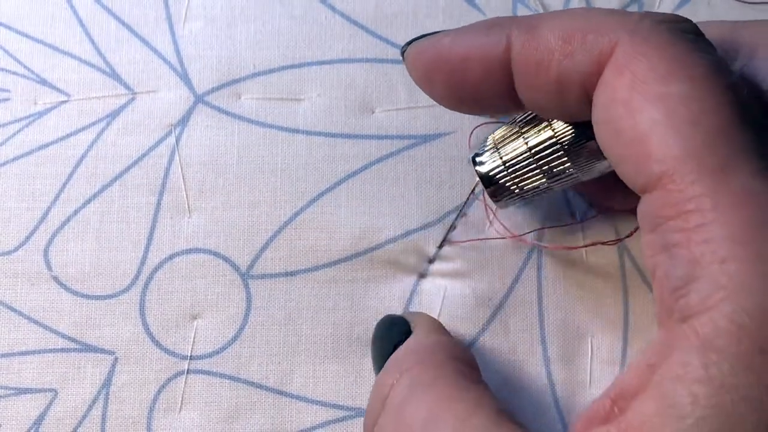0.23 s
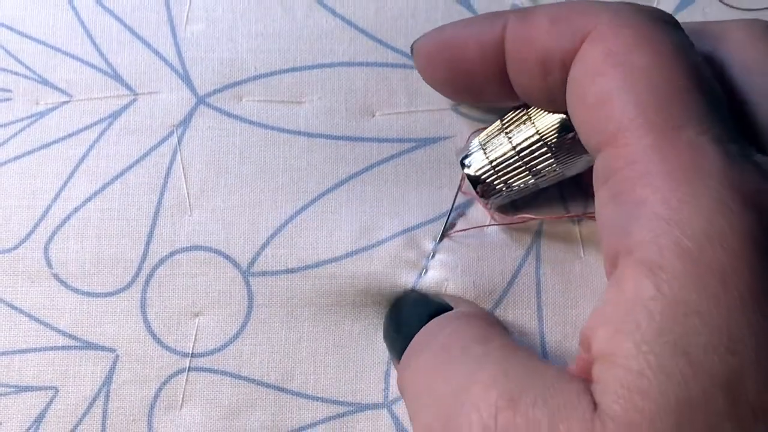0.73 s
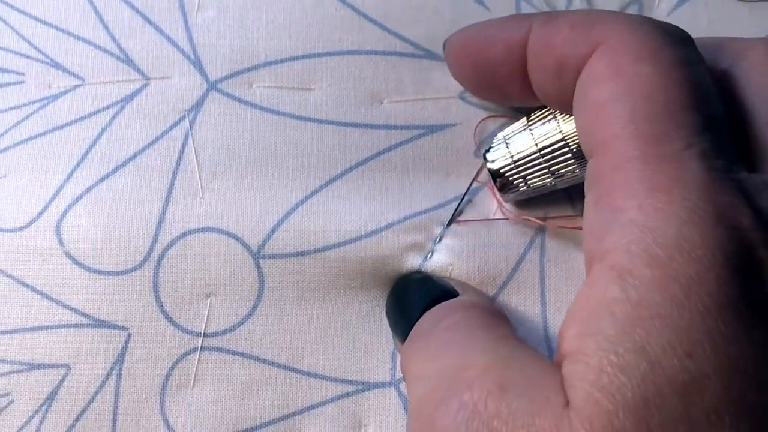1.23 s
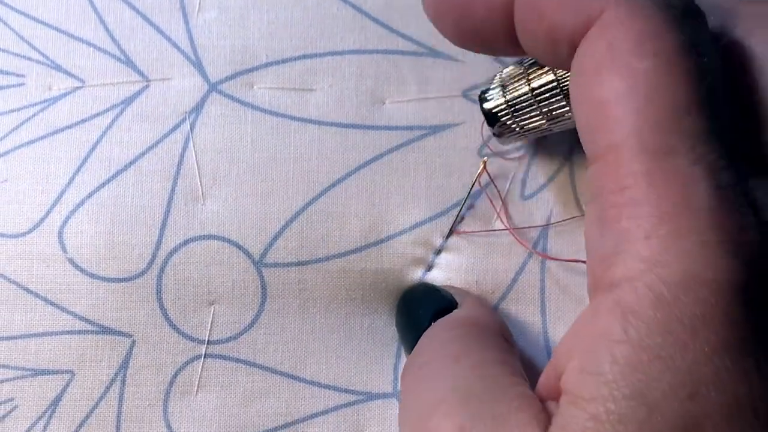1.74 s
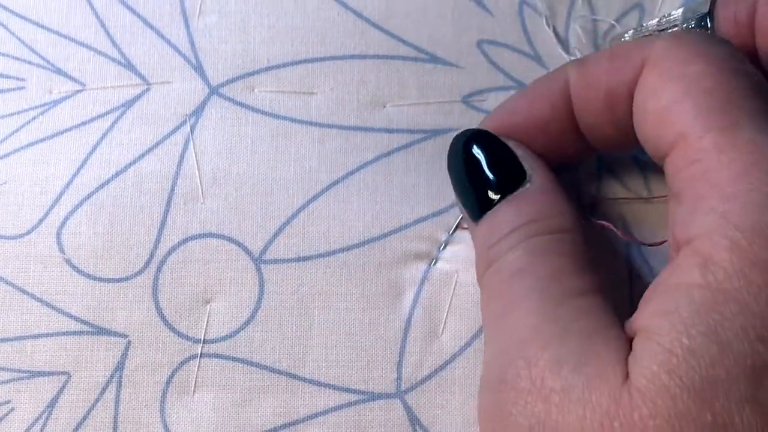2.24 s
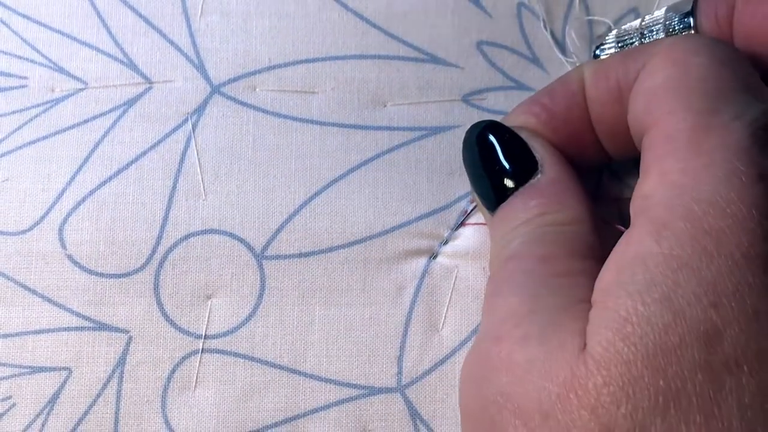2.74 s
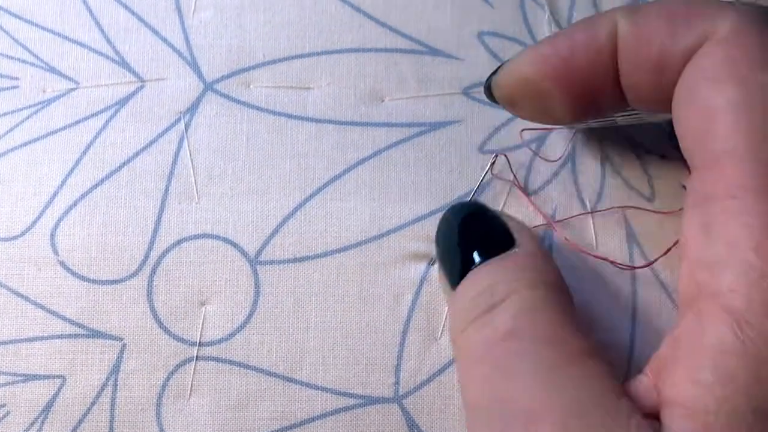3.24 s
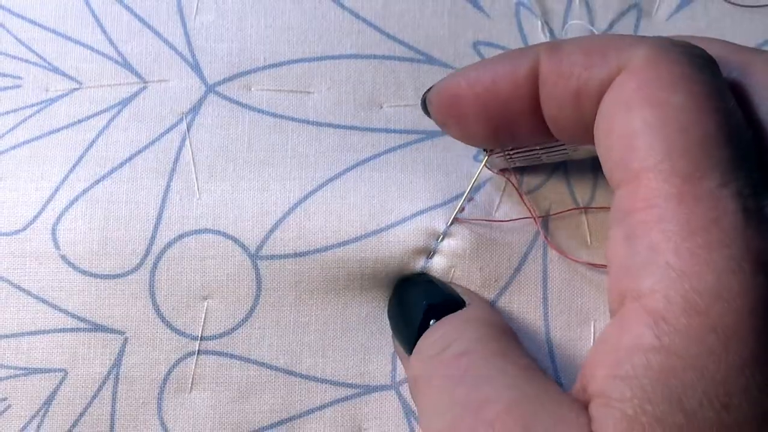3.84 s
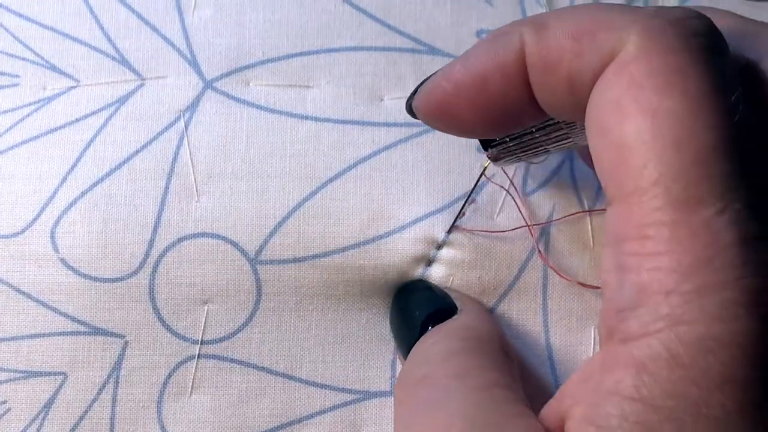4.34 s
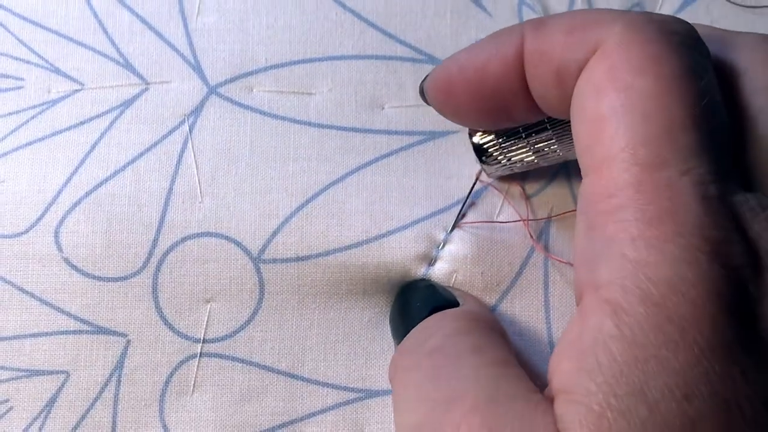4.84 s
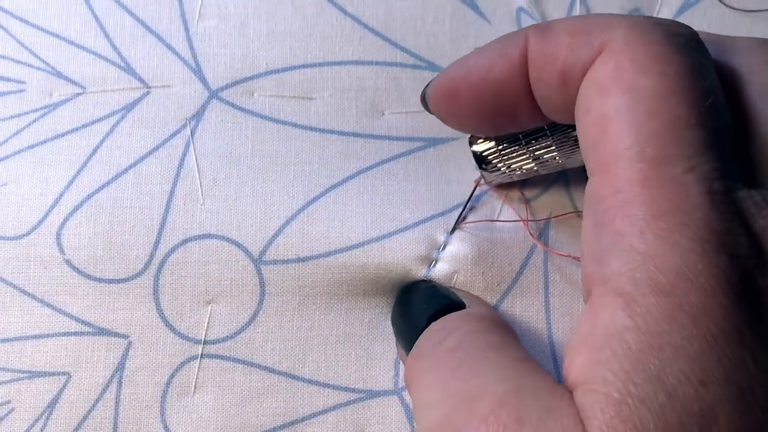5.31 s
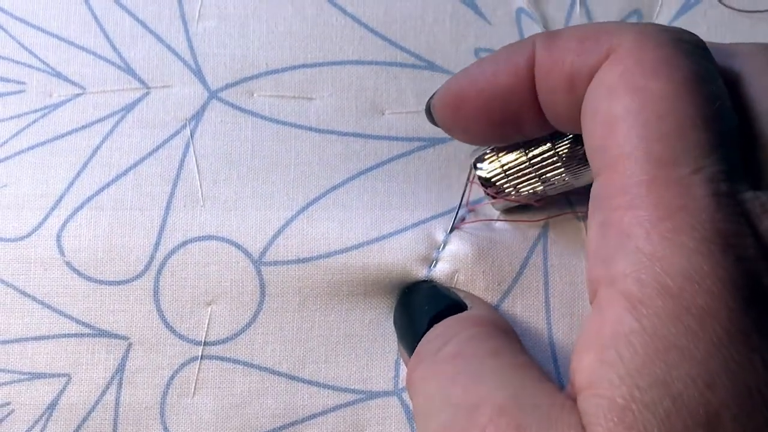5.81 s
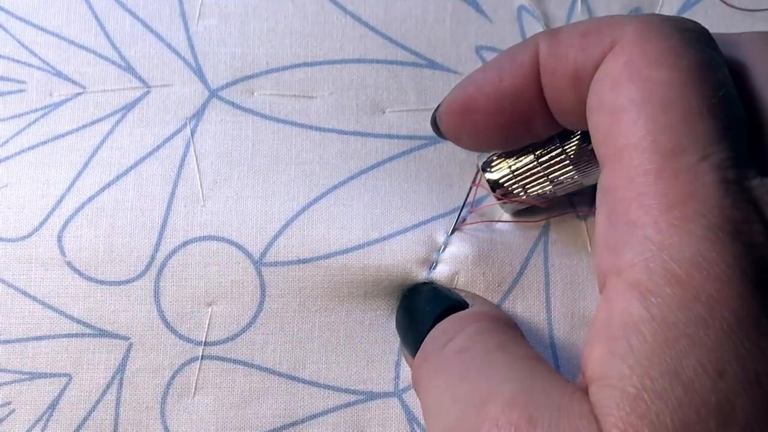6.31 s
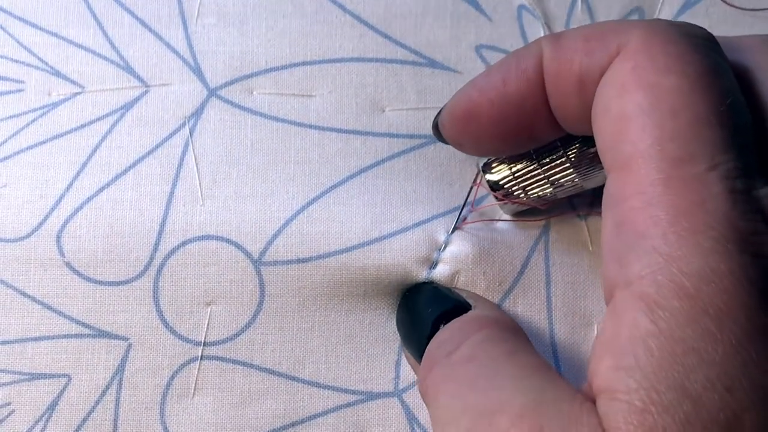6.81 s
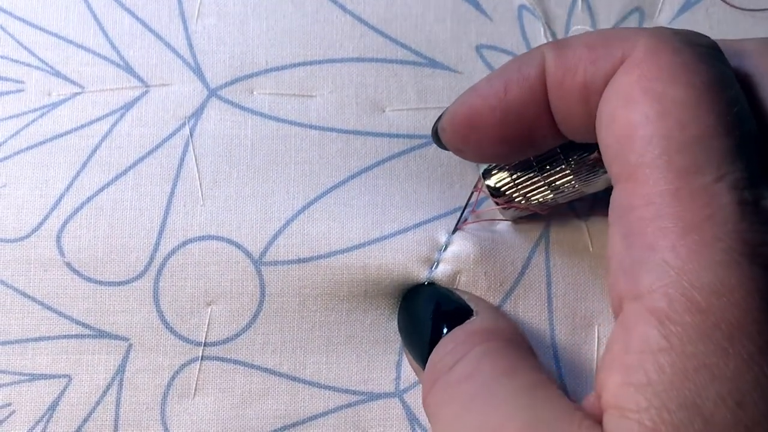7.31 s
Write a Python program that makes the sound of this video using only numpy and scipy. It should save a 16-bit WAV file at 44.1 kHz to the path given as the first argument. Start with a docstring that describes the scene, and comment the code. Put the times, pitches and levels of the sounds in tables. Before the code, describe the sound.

A metal thimble clicks irregularly against a needle going through taut cloth, with soft fabric brushing over a faint hum and thin whine.

```python
"""A metal thimble nudges a quilting needle through cloth stretched in a hoop, close by in a small room.
A mains hum and a small motor's thin whine run from the start. First come a few clicks, each a steel
tick plus a dull thump of the tight cloth. Then fingers brush the fabric, a thumb rasps near 2 s and
the needle pricks softly. Clicks return at 4.4 s; after the sharpest, at 5.6 s, the whine eases, and
one last click falls at 7.1 s. Automatic gain control turns everything down after the loud clicks."""
import sys
import numpy as np
from scipy import signal
from scipy.fft import rfft, irfft, next_fast_len
from scipy.io import wavfile
from scipy.ndimage import uniform_filter1d

SR = 44100
rng = np.random.default_rng(int(sys.argv[2]) if len(sys.argv) > 2 else 0)


def inscribe(sig):
    """Save sig as 16-bit PCM at rate SR to the path in sys.argv[1].

    A 1-D sig is mono; a 2-D sig holds one channel per row.
    Samples are clipped to [-1, 1] before scaling.
    """
    pcm = np.round(np.clip(np.atleast_2d(sig).T, -1, 1) * 32767)
    wavfile.write(sys.argv[1], SR, pcm.astype(np.int16))


N = 333396
TIME = np.arange(N) / SR
CONTACT_TIME = np.arange(-64, 448) / SR  # seconds around one contact


def clicks():
    """The thimble ticks on the needle, which passes the blow on to cloth and hoop."""
    # Pitch and breadth (1 is usual, more is duller) depend on where the cloth is pressed.
    # Each row: start in seconds, cloth pitch in Hz, cloth level in dB, breadth, hoop level in dB,
    # cancelled band in Hz, needle pitch in Hz, needle level in dB, tick pitch in Hz, tick level in dB,
    # skid fade in seconds. Levels in all tables are relative.
    contacts = [(0.2491, 410, -48, 1.5, -47, 782, 1530, -44.5, 12500, -54, 0.0009),
                (0.2551, 192, -46.5, 0.9, -53.5, 760, 2170, -43.5, 12000, -49, 0.0011),
                (0.4009, 444, -47, 0.46, -55, 782, 4500, -52, 11000, -58, 0.00068),
                (0.9755, 398, -60, 0.6, -63, 782, 3385, -44, 7950, -48, 0.00025),
                (1.268, 520, -46.5, 1.7, -42, 850, 3380, -39.5, 11800, -35.5, 0.0003),
                (1.273, 467, -38.5, 1, -59, 840, 3670, -37.5, 13500, -41, 0.00064),
                (1.4534, 442, -42, 1.1, -41, 782, 4160, -48, 13200, -41.5, 0.00067),
                (1.469, 430, -56, 1.2, -58, 782, 3040, -44, 14100, -39, 0.00082),
                (1.47, 438, -26, 1.22, -37, 785, 3000, -43, 14400, -53, 0.00076),
                (4.376, 300, -58, 1.2, -68, 782, 3400, -66, 14000, -58, 0.0003),
                (4.3813, 288, -46, 1.2, -56, 782, 3370, -55, 13100, -49.5, 0.00046),
                (4.4037, 324, -44, 1.4, -48.5, 770, 2500, -45, 14300, -37.5, 0.0003),
                (4.6197, 370, -33, 1.07, -45.5, 782, 2320, -53.5, 11800, -48, 0.00042),
                (5.5947, 565, -38, 0.77, -31.5, 713, 3400, -36, 12000, -23.5, 0.00036),
                (5.5973, 373, -29, 0.74, -38.5, 710, 3360, -44.5, 12000, -38, 0.00091),
                (7.089, 457, -27.5, 1.18, -35.5, 796, 1940, -42.5, 7300, -35, 0.0006)]
    # The snap of steel on steel. Each row: multiple of the tick pitch, level in dB.
    steel_spectrum = [(.04, -55), (.17, -29.5), (.4, -8.5), (.6, -15), (.8, -3.5), (.92, -3.5), (1, 3.5),
                      (1.08, -6.5), (1.18, -1), (1.32, -2.5), (1.9, -1)]
    out = np.zeros(N)
    for (start, cloth_hz, cloth_db, breadth, hoop_db, notch_hz,
         needle_hz, needle_db, tick_hz, tick_db, skid_s) in contacts:
        force = skid(slip_share=1.1, fade_s=skid_s)
        tick = np.convolve(force, ring(pitched(steel_spectrum, tick_hz), ripple_db=1.2))
        add(out, start + CONTACT_TIME[0], amp(tick_db) * unit_blow(tick))
        for at, part in needle_hoop_cloth(start, cloth_hz, cloth_db, needle_hz, needle_db,
                                          hoop_db, breadth):
            add(out, at, hollowed(part, notch_hz))
    return out


def pricks():
    """The point pricks the weave or a finger lands, stirring needle, cloth and hoop without a tick."""
    # Each row: start in seconds, cloth pitch in Hz, cloth level in dB, needle level in dB,
    # needle pitch in Hz.
    soft_contacts = [(0.02, 400, -75, -61, 3000), (0.261, 99, -49.5, -80, 1800),
                     (0.8418, 420, -52.5, -52, 3300), (1.174, 416, -50.5, -59.5, 2000),
                     (1.7988, 400, -64, -59.5, 3170), (1.8556, 310, -46, -71, 1800),
                     (1.978, 258, -59, -78, 1800), (1.994, 360, -52, -83, 1800),
                     (2.6832, 404, -79, -57.5, 2830), (3.053, 400, -59, -65, 1600),
                     (3.109, 252, -46.5, -59.5, 3230), (3.262, 330, -58.5, -77, 3170),
                     (3.294, 306, -55, -83, 1800), (3.6174, 400, -78, -61, 2600),
                     (6.304, 320, -58, -83, 1800), (6.406, 317, -61, -79, 1800),
                     (6.472, 298, -58.5, -80, 1810), (6.692, 380, -65, -77, 1800)]
    out = np.zeros(N)
    for start, cloth_hz, cloth_db, needle_db, needle_hz in soft_contacts:
        hoop_db = 0.62 * cloth_db + 0.38 * needle_db - 5  # both cloth and needle shake the hoop
        for at, part in needle_hoop_cloth(start, cloth_hz, cloth_db, needle_hz, needle_db, hoop_db):
            add(out, at, hollowed(part))
    return out


def needle_hoop_cloth(start, cloth_hz, cloth_db, needle_hz, needle_db, hoop_db, breadth=1):
    """The needle twangs, the hoop knocks and the cloth thumps: three pairs of start time and sound."""
    # The needle bending. Each row: multiple of its pitch, level in dB.
    needle_spectrum = [(.2, -12.5), (.62, -10.5), (.82, -6), (1, 0), (1.2, -5.5), (1.45, -10), (1.8, -9),
                       (2.3, -8.5), (3.6, -17), (5, -24)]
    # The hoop ringing. Each row: frequency in Hz, level in dB.
    hoop_spectrum = [(60, -58), (300, -12), (600, -0.5), (950, 4.5), (1300, 2.5), (1550, -4), (1850, -2),
                     (2200, -19.5), (5000, -19.5)]
    # Tight cloth, muffled by hand and padding. Each row: multiple of its pitch, level in dB.
    cloth_spectrum = [(.05, -40), (.3, -11.5), (.45, -7), (.72, 1), (1, 6.5), (1.25, 1.5), (1.55, -5),
                      (1.95, -17.5), (4, -51.5), (12, -86)]
    force = skid(slip_share=1.36, fade_s=0.00097)
    needle = np.convolve(force, ring(pitched(needle_spectrum, needle_hz), ripple_db=3.1))
    hoop = ring(hoop_spectrum, ripple_db=3.0)
    cloth = ring(pitched(cloth_spectrum, cloth_hz, breadth), ripple_db=3.1)
    return [(start + CONTACT_TIME[0], amp(needle_db) * unit_blow(needle)),
            (start, amp(hoop_db) * unit_blow(hoop)),
            (start + 0.00028, amp(cloth_db) * unit_blow(cloth))]  # soft cloth answers a moment later


def skid(slip_share, fade_s):
    """One hard hit followed by tiny slips; it feeds all frequencies about equally."""
    t = CONTACT_TIME
    slips = rng.standard_normal(len(t)) * np.exp(-abs(t) / fade_s) * (t > 0)
    spectrum = rfft((t == 0) + slip_share * slips / np.linalg.norm(slips))
    return irfft(spectrum / np.sqrt(abs(spectrum) ** 2 + .1))


def ring(spectrum, ripple_db, size=2048):
    """A struck part rings; every point of contact favours other frequencies."""
    hz = np.fft.rfftfreq(size, 1 / SR)
    ripple = uniform_filter1d(rng.standard_normal(len(hz)), size=18)
    ripple = unit_rms(uniform_filter1d(ripple, size=12))
    log_gain = np.log(amp(look_up(spectrum, hz) + ripple_db * ripple))
    mirrored = np.concatenate([log_gain, log_gain[-2:0:-1]])
    with_phase = np.exp(np.conj(signal.hilbert(mirrored)))  # so the ring follows the hit
    return np.fft.ifft(with_phase).real


def rubbing(size=32768):
    """Scrapes start quickly and die fast; slides swell and fade in one round arch."""
    # Nail or thread scraping the weave. Each row: start in seconds, level in dB,
    # brightness in dB per octave, low rustle compared with the scratch in dB.
    scrapes = [(0.646, -64.5, 6, -23), (1.285, -64.5, 9, -13), (1.68, -65.5, 4, -14),
               (2.678, -59.5, 2, -10), (3.61, -59.5, 1.6, -11)]
    # Fingers sliding over the cloth or bunching it onto the needle. Each row: start in seconds,
    # length in seconds, then level, brightness and rustle as above.
    slides = [(0.761, 0.27, -70.5, 1.5, 1.5), (0.997, 0.23, -70.5, -10, 4), (1.843, 0.21, -71.5, 10.5, 6),
              (2.0, 0.22, -68.5, -2.5, -17), (3.128, 0.22, -71, 6, 4), (3.297, 0.23, -73.5, 0.5, 0.5),
              (3.664, 0.13, -65, -11, -20), (4.021, 0.12, -75.5, 8, -7), (4.322, 0.063, -68, -5, -20),
              (6.049, 0.19, -79.5, -7, 7)]
    rise_s, fade_s = 0.01, 0.039
    out, t = np.zeros(N), np.arange(size) / SR
    flick = np.minimum(t / rise_s, 1) * np.exp(-np.maximum(t - rise_s, 0) / fade_s)
    for start, db, tilt_db, rustle_db in scrapes:
        add(out, start, amp(db) * flick * friction(t, tilt_db, rustle_db))
    for start, length, db, tilt_db, rustle_db in slides:
        add(out, start, amp(db) * arch(t, length) * friction(t, tilt_db, rustle_db))
    return out


def friction(t, tilt_db, rustle_db):
    """Skin catches on the weave in tiny grains while the cloth rustles underneath in uneven lumps."""
    # The bright scratch and the low rustle. Each row: frequency in Hz, level in dB.
    scratch_spectrum = [(200, 4.5), (600, 6), (1100, 6), (1500, 0.5), (2100, -6.5), (3200, -2.5),
                        (4500, -10), (6200, -7), (8000, -17), (10500, -24.5), (13000, -20.5),
                        (16000, -31.5)]
    rustle_spectrum = [(50, -12), (150, -9), (300, -2), (450, -10), (750, -19.5), (1500, -21.5),
                       (4000, -32.5)]
    size, knots = len(t), t[::700]
    grip = np.interp(t, knots, rng.standard_normal(len(knots)))  # the finger sticks and lets go
    catches = rng.random(size) < 3500 / SR  # about 3500 a second
    catch_db = 2.6 * np.minimum(rng.exponential(1, size), 5)
    grains = rng.standard_normal(size) * (catches * amp(catch_db) + 0.38)
    scratch = amp(1.3 * grip) * coloured(grains, scratch_spectrum, tilt_db)
    rustle = amp(rustle_db + 2.8 * grip) * coloured(rng.standard_normal(size), rustle_spectrum)
    return scratch + rustle


def rasping(slips_per_s=300, size=16384):
    """The thumb drags over the threads, and its uneven slips make the stretched cloth ring."""
    # Thumb strokes. Each row: start in seconds, length in seconds, level in dB.
    strokes = [(1.845, 0.36, -73), (2.019, 0.36, -72)]
    # The cloth's narrow ring. Each row: frequency in Hz, level in dB.
    rasp_spectrum = [(300, -26), (800, -13), (975, 7), (1070, -14), (1180, 7), (1300, -15), (2500, -34)]
    out, t = np.zeros(N), np.arange(size) / SR
    for start, length, db in strokes:
        slips = rng.standard_normal(size) * (rng.random(size) < slips_per_s / SR)
        add(out, start, amp(db) * arch(t, length) * coloured(slips, rasp_spectrum))
    return out


def hollowed(x, hz=782, width_hz=120):
    """The straight path from hoop to microphone cancels one narrow band."""
    return x - signal.lfilter(*signal.iirpeak(hz, hz / width_hz, SR), x)


def room_echo(x, level_db, echoes_per_s=4000, size=22050):
    """The room throws back scattered echoes, each band dying at its own speed."""
    # How long the room rings. Each row: frequency in Hz, seconds to fade by 60 dB.
    fade_times = [(150, 0.35), (450, 0.34), (750, 0.38), (1200, 0.53), (2400, 0.3), (4000, 0.28),
                  (8000, 0.23), (15000, 0.24)]
    # The tone of the echo. Each row: frequency in Hz, level in dB.
    echo_spectrum = [(100, 6), (300, 5), (450, -2), (600, 7), (800, 7.5), (1200, -1.5), (1700, 0),
                     (2400, 0.5), (3400, -0.5), (6000, -0.5), (12000, -6), (16000, -14.5)]
    echoes = rng.choice([-1., 1.], size) * (rng.random(size) < echoes_per_s / SR)
    hz, t, bands = signal.stft(echoes, SR, nperseg=256)
    bands *= amp(look_up(echo_spectrum, hz)[:, None] - 60 * t / look_up(fade_times, hz)[:, None])
    tail = signal.istft(bands, SR, nperseg=256)[1]
    tail *= np.clip((np.arange(len(tail)) / SR - 0.003) / 0.002, 0, 1)  # near surfaces answer in 3-5 ms
    return amp(level_db) * signal.fftconvolve(x, tail / np.linalg.norm(tail))[:N]


def background(sink_db_per_s=0.42):
    """Room rumble and hiss, mains hum and motor whine, all slowly getting quieter."""
    # Rumble and hiss. Each row: frequency in Hz, level in dB.
    air_spectrum = [(20, -17.5), (35, -7), (55, 2), (90, -3), (180, -5), (280, -6), (380, -12),
                    (800, -18.5), (2000, -23), (4500, -25.5), (6500, -27), (10500, -33.5), (13000, -29),
                    (16000, -36.5)]
    # The hum, then the tones of the whine. Each row: pitch in Hz, width in Hz, first and last level
    # in dB before sinking and easing, dB lost when the whine eases (below zero is a gain).
    tones = [(119.2, 0.57, -63, -62, 1), (271.2, 12.38, -79, -70.5, 5), (1111, 13.2, -79, -80, -2),
             (1189.5, 3.66, -75, -73.5, 5.5), (1219, 3.74, -78, -75, 7.5), (1400, 60, -78.5, -99, -10),
             (2687, 9.6, -78.5, -79, -1), (4123, 52, -75, -96.5, -2), (4500, 14, -77.5, -77.5, 1),
             (4600, 45, -78, -83.5, 2.5), (5470, 17, -78, -82.5, 7.5), (5710, 31, -76, -87, 7),
             (5742, 14.2, -75, -81, 1)]
    air = amp(-60.5) * coloured(rng.standard_normal(next_fast_len(N)), air_spectrum)[:N]
    hum_and_whine = sum(wavering_tone(*row) for row in tones)
    return (air + hum_and_whine) * amp(1.5 - sink_db_per_s * TIME)


def wavering_tone(hz, width_hz, first_db, last_db, eased_db, step=100):
    """A tone throbs with each motor turn and flutters at random; its wandering phase gives it width."""
    motor_hz, throb_db, flutter_db, flutter_s = 27.3, 3, 2, 0.025
    knots = TIME[::step]
    wander = np.cumsum(rng.standard_normal(len(knots))) * np.sqrt(2 * np.pi * width_hz * step / SR)
    flutter = unit_rms(smoothed(rng.standard_normal(len(knots)), flutter_s, rate=SR / step))
    turn = 2 * np.pi * (motor_hz * knots + rng.random())
    throb = np.sin(turn) + 0.93 * np.sin(2 * turn)
    depth = min(width_hz / 5, 1)  # the narrow hum stays nearly steady
    swing_db = depth * np.interp(TIME, knots, flutter_db * flutter + throb_db * throb)
    eased = np.clip((TIME - 5.62) / 0.1, 0, 1)  # the whine eases once, over 0.1 s
    strength = np.linspace(amp(first_db), amp(last_db), N) * amp(swing_db - eased_db * eased)
    return np.sqrt(2) * strength * np.sin(2 * np.pi * hz * TIME + np.interp(TIME, knots, wander))


def amp(db):
    """Turns decibels into a gain."""
    return 10 ** (np.asarray(db) / 20)


def unit_rms(x):
    """Scales a signal to an average power of one."""
    return x / np.sqrt(np.mean(x ** 2) + 1e-30)


def unit_blow(x):
    """Gives a short sound as much energy as a power of one lasting 5 ms."""
    return x * np.sqrt(.005 * SR / (np.sum(x ** 2) + 1e-30))


def look_up(table, hz):
    """Reads between a table's rows, with frequency counted in octaves."""
    row_hz, values = np.transpose(table)
    return np.interp(np.log(hz + 1), np.log(row_hz + 1), values)


def pitched(multiples, hz, breadth=1):
    """Turns multiples of a pitch into a spectrum; damping makes it broader."""
    return [(multiple ** breadth * hz, db) for multiple, db in multiples]


def coloured(noise, spectrum, tilt_db=0):
    """Shapes noise with a spectrum, tilts its treble per octave and sets its power to one."""
    hz = np.fft.rfftfreq(len(noise), 1 / SR)
    gain = amp(look_up(spectrum, hz) + tilt_db * np.log2(1 + hz / 1000))
    return unit_rms(irfft(rfft(noise) * gain, len(noise)))


def arch(t, length):
    """Swells from nothing to one and fades back."""
    return np.sin(np.pi * np.minimum(t / length, 1))


def smoothed(x, seconds, rate=SR):
    """Follows a signal with a lag."""
    kept = np.exp(-1 / (seconds * rate))
    return signal.lfilter([1 - kept], [1, -kept], x)


def add(mix, start, sound):
    """Adds a sound to the mix at a time in seconds."""
    part = mix[max(round(start * SR), 0):][:len(sound)]
    part += sound[:len(part)]


def scene():
    """Needlework and its echo over the background, in one channel."""
    hands = amp(2.5) * (clicks() + pricks()) + amp(7.0) * hollowed(rubbing() + rasping())
    return (hands + room_echo(hands, level_db=-19.0) + background())[None]


def record(dry):
    """Gain control dips after bright clicks and creeps back; then the highest treble is cut off."""
    threshold_db, cut_per_db, recovery_db_per_s = -55.5, 0.4067, 17.5
    treble_hz, top_hz = 4000, 16450
    treble = signal.lfilter(*signal.butter(1, treble_hz, "high", fs=SR), dry[0])
    level_db = 10 * np.log10(smoothed(treble ** 2, seconds=0.13) + 1e-12)
    cut_db = cut_per_db * np.maximum(level_db - threshold_db, 0)
    recovery_db = recovery_db_per_s * TIME
    held_db = np.maximum.accumulate(cut_db + recovery_db) - recovery_db
    turned_down = dry * amp(-smoothed(held_db, seconds=0.091))
    low_pass = signal.firwin(301, top_hz, window=("kaiser", 8), fs=SR)
    return signal.oaconvolve(turned_down, low_pass[None], "same")


dry = scene()
out = record(dry)
inscribe(out)
```